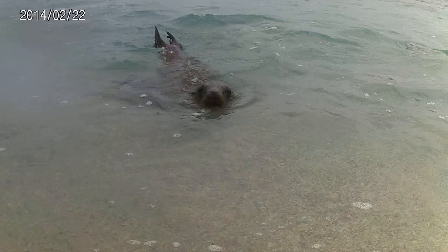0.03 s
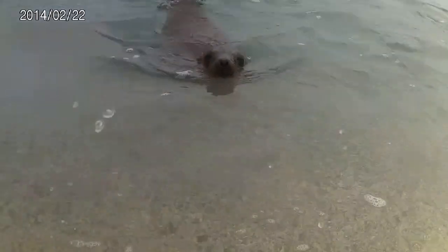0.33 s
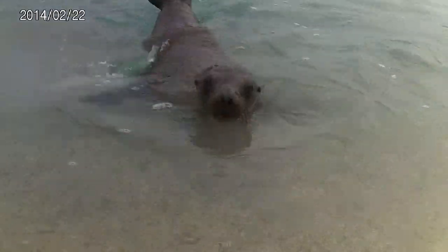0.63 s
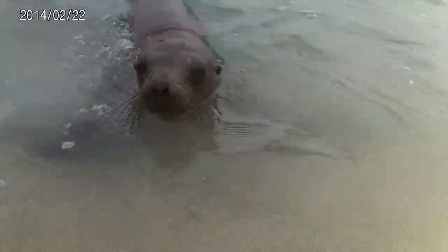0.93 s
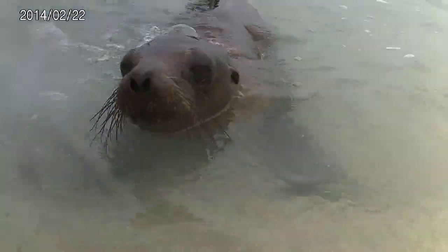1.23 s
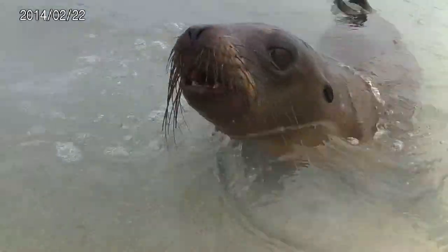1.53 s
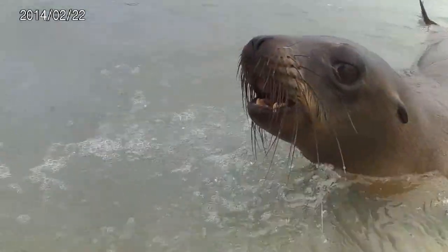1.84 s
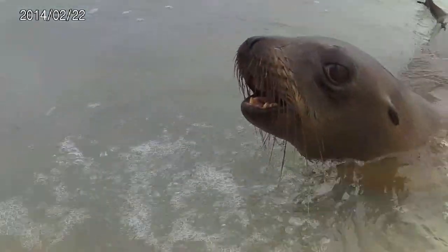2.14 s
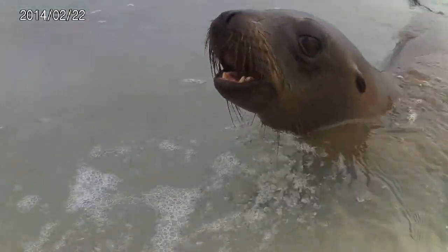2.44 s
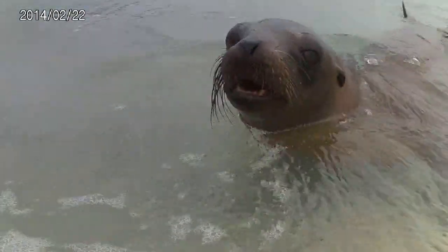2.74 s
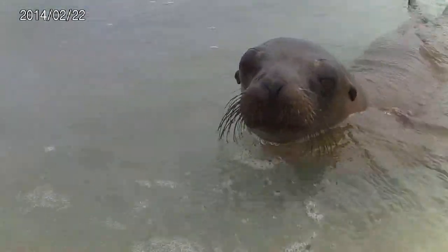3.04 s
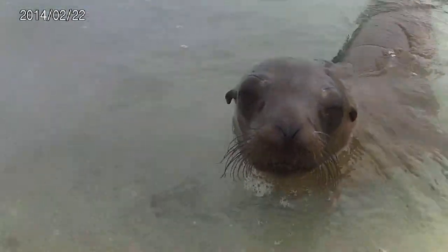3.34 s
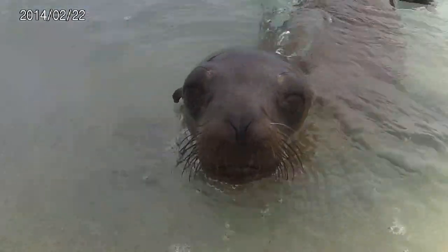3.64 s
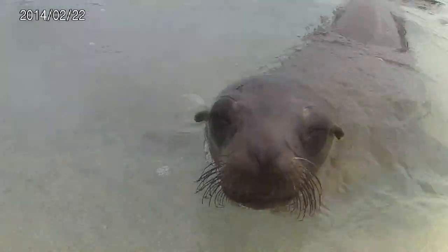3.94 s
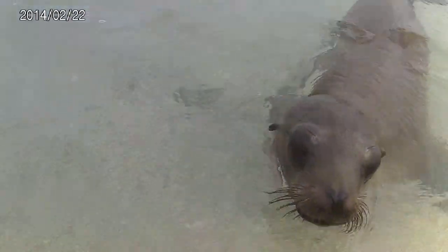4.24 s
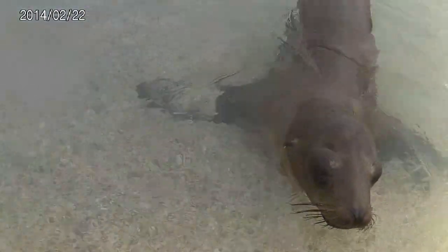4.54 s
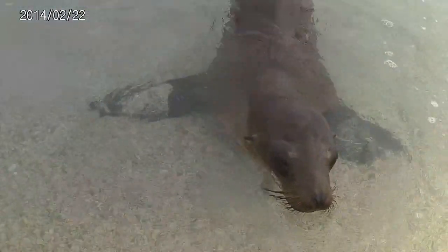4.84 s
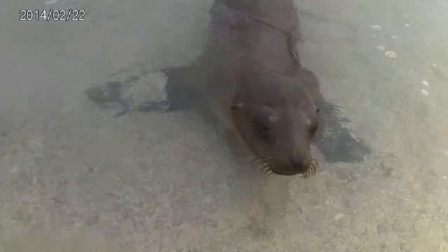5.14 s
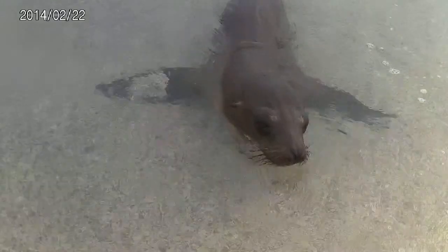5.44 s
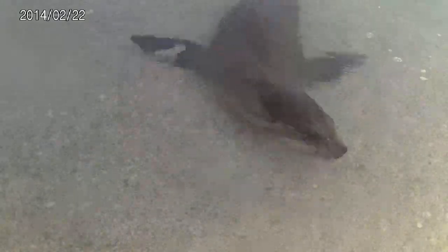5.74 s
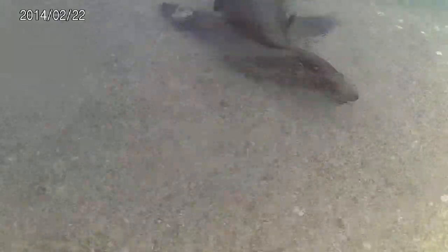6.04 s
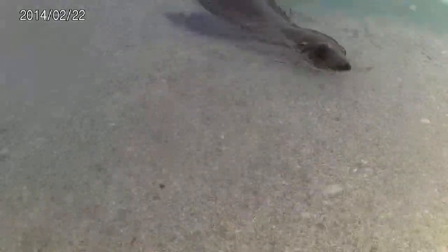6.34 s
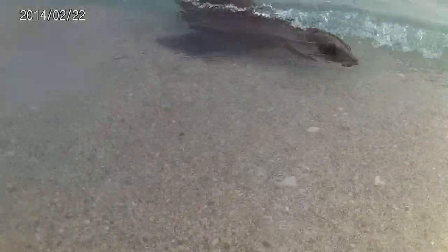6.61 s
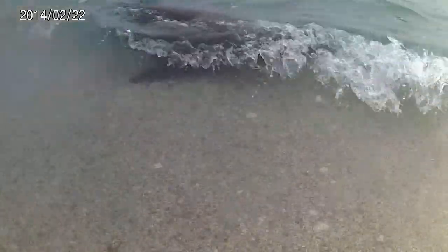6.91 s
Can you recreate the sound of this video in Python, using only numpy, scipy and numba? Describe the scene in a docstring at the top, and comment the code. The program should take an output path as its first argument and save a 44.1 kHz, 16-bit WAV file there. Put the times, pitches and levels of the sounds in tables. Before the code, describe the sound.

A sea lion gives a quick run of dry, throaty rasps over shallow water bubbling, sloshing and dripping, all muffled and hollow.

```python
"""In the shallows of a beach, a sea lion swims up close to a camera in a waterproof case.
Water bubbles, sloshes and drips over distant surf. The animal lifts its open mouth and gives a quick
run of dry rasps: fluttering puffs of air that ring in its throat. Near the end a small wave breaks.
The hand-held case rumbles and muffles the sounds into a narrow, hollow band,
and the electronics hiss and whine faintly."""
import sys
import numpy as np
from scipy import signal
from scipy.fft import rfft, irfft
from scipy.io import wavfile
from scipy.ndimage import uniform_filter1d
from numba import njit

SR = 44100
rng = np.random.default_rng(int(sys.argv[2]) if len(sys.argv) > 2 else 0)


def waveform_to_disk(signal):
    """Save audio, clipped to [-1, 1], as 16-bit WAV at the path in sys.argv[1]."""
    frames = np.transpose(np.atleast_2d(signal))
    scaled = np.clip(frames, -1, 1) * 32767
    samples = np.round(scaled).astype(np.int16)
    wavfile.write(sys.argv[1], SR, samples)


N = 311787
T = np.arange(N) / SR

# tone of the nearby water (frequency [Hz], level [dB])
WATER_TONE = [(150, -37), (350, -30), (520, -20), (750, -16.5), (950, -11), (1200, 0.5), (1580, -3.5),
              (1850, 1), (2600, -8.5), (3020, -1.5), (3400, -15), (4200, -24), (5400, -41.5), (5950, -67)]
# how strongly the water washes past (time [s], level [dB])
WASH_LEVELS = [(.16, -52), (.26, -55), (.45, -49.5), (.64, -47), (.75, -51), (1.45, -50), (1.8, -55.5),
               (2.25, -53), (2.76, -48), (2.98, -52.5), (3.42, -53.5), (3.62, -52), (4.42, -51),
               (4.87, -47.5), (5.7, -58), (6.35, -56), (6.8, -52), (7.07, -49.5)]
# hollow slosh in the wash (time [s], pitch [Hz], level over the bubbling [dB])
SLOSH_PATH = [(.2, 1453, -14), (1.45, 1590, -10), (2.1, 1363, -10), (2.48, 1766, -2.5), (2.76, 1706, 2.5),
              (2.98, 1342, 0), (4.0, 1413, -1.5), (4.8, 1515, 4), (5.8, 1420, -4.5), (7.07, 1510, 0)]
# splashes as the animal moves (start [s], length [s], bubbling [dB], foam [dB])
SPLASH_EVENTS = [(0.037, 0.15, -45.5, -51), (2.658, 0.063, -47, -54)]
# tone of fizzing spray (frequency [Hz], level [dB])
SPRAY_TONE = [(2000, -6.5), (3100, 7.5), (4100, 1), (4700, -11.5), (5400, -6), (5900, -29), (6800, -22.5),
              (8000, -33), (10500, -14.5), (12500, -19.5), (15000, -31.5)]
# tone of the surf further along the beach (frequency [Hz], level [dB])
SURF_TONE = [(70, -19), (130, -7), (200, -5), (330, -4.5), (440, -2), (800, 0.5), (1400, 1), (3000, -8),
             (6000, -42.5)]
# rumble from the restless hand on the case (time [s], level [dB])
GRIP_LEVELS = [(0, -83), (1.4, -85.5), (2.2, -90), (2.6, -89), (3.1, -93), (6.3, -90), (6.7, -82),
               (7.07, -86)]
# tone of that rumble (frequency [Hz], level [dB])
RUMBLE_TONE = [(10, -1), (28, 1), (55, -0.5), (100, -23), (400, -35), (1500, -87.5)]
# dull bumps on the case (start [s], length [s], level [dB])
BUMP_EVENTS = [(.135, .05, -66), (2.66, .04, -63)]
# tone of a bump (frequency [Hz], level [dB])
BUMP_TONE = [(10, -10), (28, 2), (60, -11), (150, -14.5), (400, -40), (1000, -102)]
# hiss of the electronics (frequency [Hz], level [dB])
HISS_TONE = [(5000, 2.5), (6000, -15.5), (6700, -9.5), (7300, -11), (8000, -21.5), (9000, -6), (10300, 0),
             (12500, 0.5), (15500, -7)]
# steady high notes of the electronics (pitch [Hz], level [dB])
WHINE_NOTES = [(9906, -106), (9982, -90.5), (10058, -92), (10134, -104)]
# the loudest plops of water (time [s], peak [dB], pitch [Hz], time to fade by 60 dB [s])
PLOP_EVENTS = [(0.107, -43.5, 466, 0.014), (.123, -32, 1280, 0.015), (.171, -40, 1740, 0.015),
               (.562, -33.5, 1780, .026), (.628, -27, 1316, 0.027), (0.66, -32.5, 1510, .017),
               (.688, -37, 1130, 0.019), (1.17, -37.5, 1540, .034), (1.405, -34, 1900, 0.021),
               (1.431, -38.5, 1112, 0.052), (1.472, -53.5, 606, 0.069), (1.487, -33, 1855, .022),
               (1.613, -36, 1380, .015), (1.685, -38, 1225, 0.05), (2.013, -37.5, 1410, 0.026),
               (2.597, -37, 1820, .016), (2.682, -33, 1890, 0.031), (2.695, -33.5, 1900, 0.013),
               (2.741, -37, 1730, 0.03), (2.805, -39, 1420, 0.03), (4.283, -34.5, 1380, 0.011),
               (4.565, -47.5, 874, 0.035), (5.967, -38.5, 1490, .05), (6.133, -44, 1950, 0.023),
               (6.242, -37, 1400, 0.0058), (6.688, -40, 2850, .034), (6.969, -37.5, 1780, 0.037)]
# tone of a sharp tap heard through the case (frequency [Hz], level [dB])
TAP_TONE = [(200, -24.5), (700, -14), (1200, 9.5), (2000, 11), (3100, 4.5), (4200, -19.5), (5400, -22),
            (6000, -67), (6800, -28), (8000, -44.5), (11000, -39.5), (15000, -55)]
# crisp ticks of spray on the case (time [s], peak [dB])
TICK_EVENTS = [(.682, -55), (.728, -56), (.839, -52), (1.043, -55), (2.682, -44.5), (2.696, -58),
               (3.925, -60)]
# tone of a tick (frequency [Hz], level [dB])
TICK_TONE = [(1000, -18), (3000, 20), (5000, 16), (5900, -10), (6700, 0), (8000, -21), (9500, -6),
             (11500, -25), (15000, -32.5)]
# the sea lion's rasps (start [s], length [s], level of the gritty part [dB])
RASP_EVENTS = [(1.141, 0.021, -56.5), (1.243, 0.017, -52.5), (1.329, 0.011, -55), (1.404, 0.034, -56.5),
               (1.443, .053, -52.5), (1.524, 0.058, -48), (1.601, 0.05, -48), (1.682, 0.05, -48),
               (1.762, 0.051, -50.5), (1.834, 0.051, -52.5), (1.922, 0.042, -52.5), (2.008, 0.052, -54),
               (2.099, .044, -54.5), (2.2, 0.031, -57), (2.286, .045, -57), (2.39, 0.031, -55.5),
               (2.471, 0.039, -53)]
# broad bands in which its throat rings (frequency [Hz], width [Hz], level [dB])
THROAT_BANDS = [(1248, 244, 0.5), (1900, 210, -4), (2876, 240, 6), (3240, 170, -5), (3680, 154, -3.5),
                (5150, 180, -20.5)]
# catches: hard clicks in and between the rasps (time [s], level [dB], pitch [Hz])
CATCH_EVENTS = [(1.223, -40, 3040), (1.247, -48, 2930), (1.474, -36.5, 2680), (1.605, -36, 2860),
                (1.648, -31.5, 2920), (1.720, -35, 2760), (1.73, -36.5, 2840), (1.888, -37.5, 3130),
                (1.969, -37, 2960), (2.385, -32, 2950), (2.398, -44, 2940), (2.411, -38.5, 3354),
                (2.424, -39, 3050), (2.482, -30.5, 2780), (2.495, -34.5, 3050), (2.509, -32, 2750),
                (2.576, -33, 2820), (2.604, -43, 3270)]
# tone of a catch (frequency [Hz], level [dB])
CATCH_TONE = [(500, -34.5), (1300, -5.5), (2200, -11), (2750, 12), (3300, -3.5), (3800, -8.5),
              (4600, -20.5), (5400, -28.5), (6100, -44.5)]
# spray of the small breaking wave (time [s], level [dB])
WAVE_LEVELS = [(6.3, -100), (6.5, -75), (6.72, -70.5), (6.84, -72.5), (6.95, -68), (7.07, -66.5)]


def undb(db):
    """Turn decibels into a number to multiply by."""
    return 10 ** (np.asarray(db) / 20)


def unit(x):
    """Scale a sound to an average strength (rms) of 1."""
    return x / np.sqrt(np.mean(x ** 2))


def add(out, start_s, x):
    """Mix x into out at the given time."""
    i = int(start_s * SR)
    out[i:i + len(x)] += x[:N - i]


def curve(points, column=1):
    """Join one column of a table with straight lines over time."""
    return np.interp(T, np.array(points)[:, 0], np.array(points)[:, column])


def wander(per_second):
    """A smooth random drift, roughly 1 either side of zero."""
    hold = int(SR / per_second)
    steps = np.repeat(rng.standard_normal(N // hold + 1), hold)
    return 1.1 * uniform_filter1d(uniform_filter1d(steps, hold), hold)[:N]


def shape_tone(x, tone, size=8192):
    """Filter x through a tone table; plain noise keeps its overall strength."""
    hz, db = np.transpose(tone)
    gain = undb(np.interp(np.log(np.fft.rfftfreq(size, 1 / SR) + 1), np.log(hz), db))
    # make the filter ring only after a sound, never before it
    cepstrum = irfft(np.log(gain))
    cepstrum[1:size // 2] *= 2
    cepstrum[size // 2 + 1:] = 0
    response = irfft(np.exp(rfft(cepstrum)))
    return signal.fftconvolve(x, response / np.linalg.norm(response))[:len(x)]


@njit
def resonate(x, hz, width_hz):
    """Let through a band around a moving pitch, with the centre at full strength."""
    out, band_state, low_state = np.empty(len(x)), 0., 0.
    for i in range(len(x)):
        tuning, damping = np.tan(np.pi * hz[i] / SR), width_hz / hz[i]
        band = (band_state + tuning * (x[i] - low_state)) / (1 + tuning * (tuning + damping))
        band_state = 2 * band - band_state
        low_state += 2 * tuning * band
        out[i] = damping * band
    return out


def muffle(x, edge_hz=5450):
    """The case lets almost nothing through above its upper edge."""
    return signal.sosfilt(signal.butter(24, edge_hz, fs=SR, output="sos"), x)


def bubbles(per_second, spread_db, rush_db):
    """Countless tiny bursts of uneven size over the smooth rush of those further off."""
    size = undb(spread_db * np.minimum(rng.exponential(size=N), 4))
    bursts = (rng.random(N) < per_second / SR) * size * rng.choice([-1, 1], N)
    return unit(unit(bursts) + undb(rush_db) * rng.standard_normal(N))


def wash(calm_db=-53, calm_foam_db=-59.5, foam_growth=.7, foam_over_spray_db=15):
    """Water bubbles and sloshes; brighter foam grows with the bubbling, the splashes and the wave."""
    low, high = (signal.butter(4, 2450, kind, fs=SR, output="sos") for kind in ("low", "high"))
    bubbling = shape_tone(bubbles(per_second=1300, spread_db=3.5, rush_db=1.5), WATER_TONE)
    bubbling = unit(signal.sosfilt(low, bubbling))
    foam = shape_tone(bubbles(per_second=2400, spread_db=2, rush_db=0), WATER_TONE)
    foam = unit(signal.sosfilt(high, foam))
    slosh_hz, slosh_db = curve(SLOSH_PATH), curve(SLOSH_PATH, column=2)
    slosh = bubbles(per_second=770, spread_db=3, rush_db=-.5)
    slosh = unit(muffle(resonate(resonate(slosh, slosh_hz, 230.), slosh_hz, 350.)))
    # bubbling and slosh share the strength of the wash
    bubbling_db = curve(WASH_LEVELS) - 10 * np.log10(1 + undb(slosh_db) ** 2)
    foam_db = calm_foam_db + foam_growth * (bubbling_db - calm_db)
    foam_gain = np.hypot(undb(foam_db), undb(curve(WAVE_LEVELS) + foam_over_spray_db))
    splash_bubbling, splash_foam = splash_swells()
    water = bubbling * np.hypot(undb(bubbling_db), splash_bubbling)
    water += slosh * undb(bubbling_db + slosh_db)
    foam *= np.hypot(foam_gain, splash_foam)
    return water * undb(.7 * wander(22)) + foam * undb(.49 * wander(25))


def splash_swells():
    """How strongly the splashes bubble and foam: each one swells and sinks smoothly."""
    bubbling, foam = np.zeros(N), np.zeros(N)
    for start, length, bubbling_db, foam_db in SPLASH_EVENTS:
        swell = np.hanning(int(length * SR))
        add(bubbling, start, undb(bubbling_db) * swell)
        add(foam, start, undb(foam_db) * swell)
    return bubbling, foam


def fizz():
    """White water fizzes in small uneven surges."""
    spray = shape_tone(bubbles(per_second=1200, spread_db=5, rush_db=-2), SPRAY_TONE)
    return undb(1.2 * wander(30)) * spray


def splash_spray(over_foam_db=-15.5):
    """Each splash throws up a little spray."""
    _, foam_gain = splash_swells()
    return undb(over_foam_db) * foam_gain * fizz()


def surf(level_db=-69.5):
    """Small waves further off make an even, darker rush."""
    return undb(level_db + .66 * wander(3.4)) * shape_tone(rng.standard_normal(N), SURF_TONE)


def handling():
    """The hand-held case rumbles faintly and is bumped twice."""
    pushes = np.zeros(N)
    for start, length, db in BUMP_EVENTS:
        count = int(length * SR)
        add(pushes, start, undb(db) * np.hanning(count) * rng.standard_normal(count))
    rumble = undb(curve(GRIP_LEVELS)) * shape_tone(rng.standard_normal(N), RUMBLE_TONE)
    return shape_tone(pushes, BUMP_TONE) + rumble


def electronics(hiss_db=-82):
    """A thin hiss, and high notes so close together that they waver."""
    whine = sum(np.sqrt(2) * undb(db) * np.sin(2 * np.pi * (hz * T + rng.random()))
                for hz, db in WHINE_NOTES)
    return whine + undb(hiss_db) * shape_tone(rng.standard_normal(N), HISS_TONE)


def crack(decay_s, tone):
    """A very short burst of noise with a peak of 1."""
    t = T[:SR // 8]
    burst = shape_tone(rng.standard_normal(len(t)) * np.exp(-t / decay_s), tone)
    return burst / abs(burst).max()


def tap(hz, ring_s, rise_s, crack_s, crack_db, glide, tone):
    """A short crack and a note that fades by 60 dB in ring_s; glide bends the note up. Peak of 1."""
    t = T[:SR // 8]
    ring = np.sin(2 * np.pi * hz * (t + glide * t ** 2 / ring_s))
    ring *= np.exp(-np.log(1000) * t / ring_s) * (1 - np.exp(-(t / rise_s) ** 2))
    both = ring / abs(ring).max() + undb(crack_db) * crack(crack_s, tone)
    return both / abs(both).max()


def plop(hz, ring_s):
    """A drop or a small air pocket rings briefly."""
    return tap(hz, ring_s, rise_s=.0012, crack_s=.21 * ring_s, crack_db=-6, glide=.016, tone=TAP_TONE)


def close_drops():
    """Large drops land close by; a few droplets tick on the case."""
    out = np.zeros(N)
    for start, db, hz, ring_s in PLOP_EVENTS:
        add(out, start, undb(db) * plop(hz, ring_s))
    for start, db in TICK_EVENTS:
        add(out, start, undb(db) * crack(decay_s=.00063, tone=TICK_TONE))
    return out


def drips(per_second=6, over_wash_db=6.5, spread_db=4, middle_hz=1552, spread_octaves=.4):
    """Small drips of uneven size and pitch fall at random, louder where the wash is strong."""
    out, wash_db = np.zeros(N), curve(WASH_LEVELS)
    for when, size, pitch in rng.random((int(per_second * N / SR), 3)):
        i = int(when * N)
        db = wash_db[i] + over_wash_db + spread_db * (2 * size - 1)
        hz = middle_hz * 2 ** (spread_octaves * (2 * pitch - 1))
        add(out, T[i], undb(db) * plop(hz, ring_s=.02))
    return out


def throat_band(x, hz, width_hz):
    """One band in which the throat rings; filtering twice makes its sides steep."""
    centre = hz * np.ones(len(x))
    return resonate(resonate(x, centre, 1.5 * width_hz), centre, 1.5 * width_hz)


def rasps(widest_mouth_s=1.93, flutter_hz=165, whistle_hz=2937, low_hz=735, rise_s=.0016, fall_s=.005):
    """Noise chopped by an uneven flutter rings in the throat, with a thin whistle and a low note."""
    out = np.zeros(N)
    for start, length, db in RASP_EVENTS:
        t = T[:int((length + .04) * SR)]  # leave room to ring out
        unsteady = wander(200)[:len(t)]
        cycles = np.cumsum(flutter_hz * np.exp(.2 * unsteady)) / SR
        fade = np.clip(t / rise_s, 0, 1) * np.clip((length - t) / fall_s, 0, 1)
        puffs = np.exp(-(cycles % 1) / .31) * rng.standard_normal(len(t)) * fade
        # the throat rings higher as the mouth opens, and towards the middle of each rasp
        from_widest_s = start - widest_mouth_s
        arch = np.sin(np.pi * np.clip(t / length, 0, 1))
        lift = 1.02 - .0798 * abs(from_widest_s) + .018 * arch
        grit = muffle(sum(undb(band_db) * throat_band(puffs, hz * lift, width)
                          for hz, width, band_db in THROAT_BANDS))
        # the whistle swells with that arch, shaken by the flutter
        pitch = whistle_hz * (lift + .0095 * unsteady)
        whistle = np.sin(2 * np.pi * np.cumsum(pitch) / SR)
        whistle *= np.sqrt(arch) * undb(3.6 * wander(260)[:len(t)])
        whistle_db = -6.5 - 12 * from_widest_s  # fades along the run
        low_note = throat_band(puffs, low_hz, width_hz=65)
        low_db = -13.5 - 25.5 * abs(from_widest_s)  # strongest with the mouth wide open
        voice = unit(grit) + undb(whistle_db) * unit(whistle) + undb(low_db) * unit(low_note)
        add(out, start, undb(db) * voice * np.sqrt(length * SR / len(t)))
    return out


def catches(upper_hz=3750, upper_db=-9):
    """Single hard pulses ring the throat at two high pitches; the last rasps break up into these."""
    out = np.zeros(N)
    for start, db, ring_hz in CATCH_EVENTS:
        for hz, band_db in ((ring_hz, -1), (upper_hz, upper_db)):
            pulse = tap(hz, ring_s=.012, rise_s=.0008, crack_s=.0022, crack_db=-1, glide=0,
                        tone=CATCH_TONE)
            add(out, start, undb(db + band_db) * pulse)
    return muffle(out)


def breaking_wave():
    """Spray builds up as a small wave tips over."""
    return undb(curve(WAVE_LEVELS)) * fizz()


def scene():
    """Water, case and sea lion, all heard at one microphone."""
    background = wash() + splash_spray() + surf() + handling() + electronics()
    return (background + close_drops() + drips() + rasps() + catches() + breaking_wave())[None]


def record(dry, start_s=.072, top_hz=15700):
    """The sound switches on just after the start, and the highest treble is cut."""
    switch_on = np.clip((T - start_s) * 1000, 0, 1)
    return signal.sosfilt(signal.ellip(10, .2, 70, top_hz, fs=SR, output="sos"), dry * switch_on)


dry = scene()
out = record(dry)
waveform_to_disk(out)
```